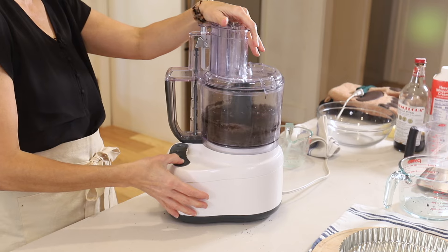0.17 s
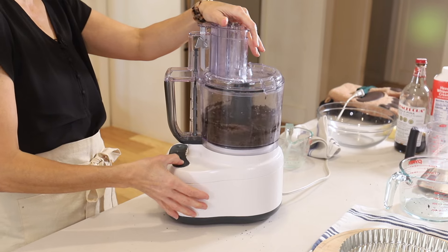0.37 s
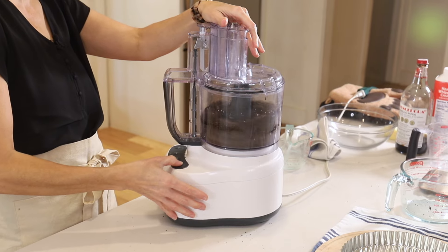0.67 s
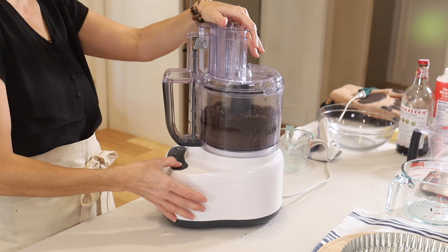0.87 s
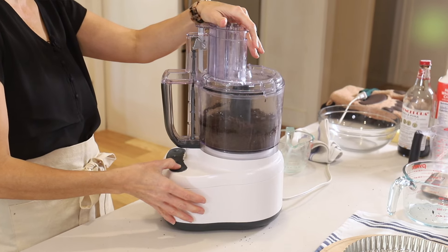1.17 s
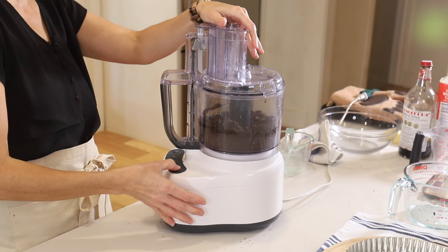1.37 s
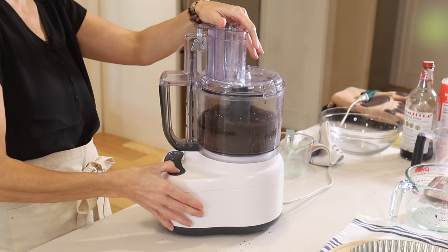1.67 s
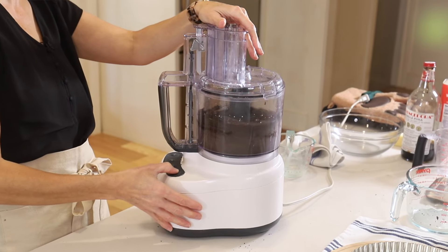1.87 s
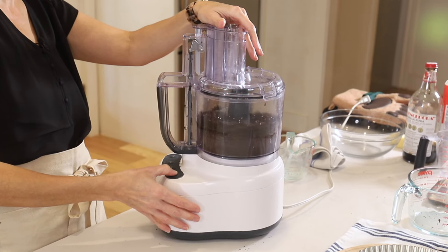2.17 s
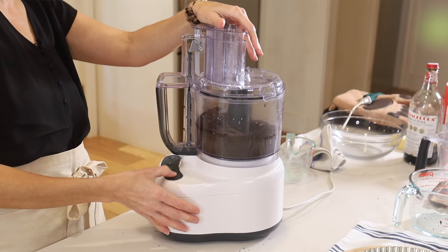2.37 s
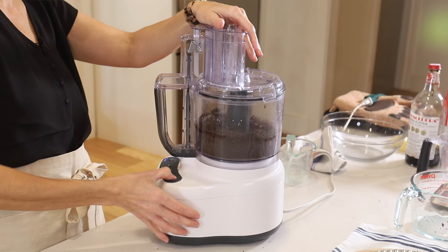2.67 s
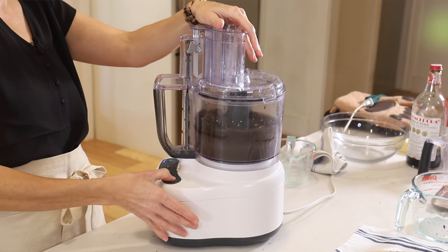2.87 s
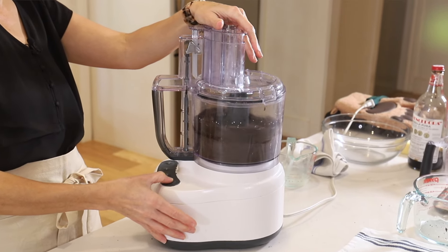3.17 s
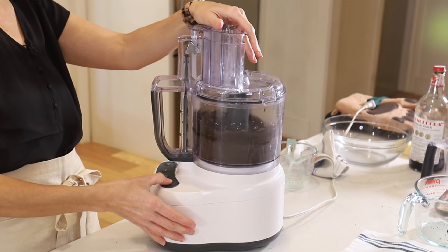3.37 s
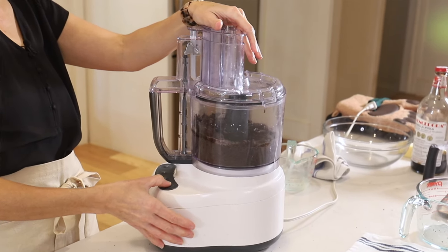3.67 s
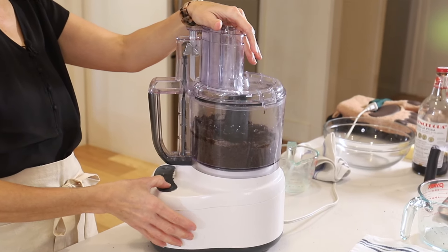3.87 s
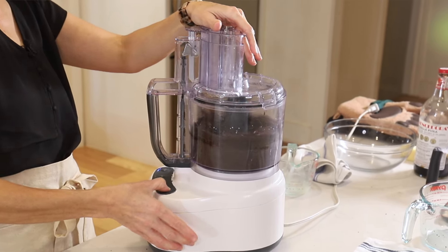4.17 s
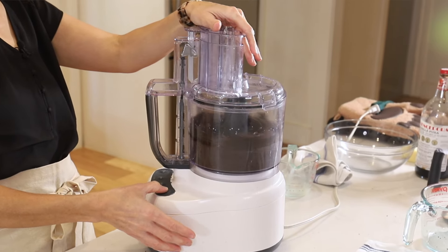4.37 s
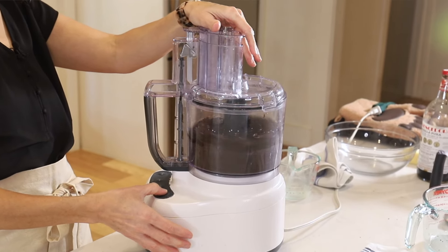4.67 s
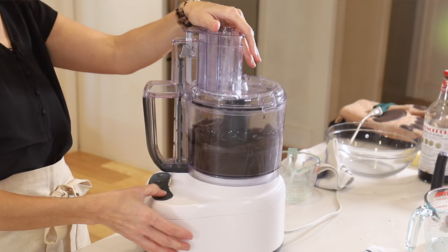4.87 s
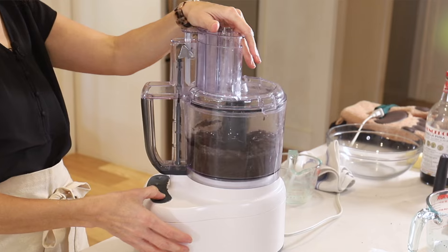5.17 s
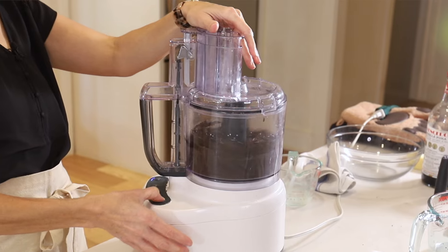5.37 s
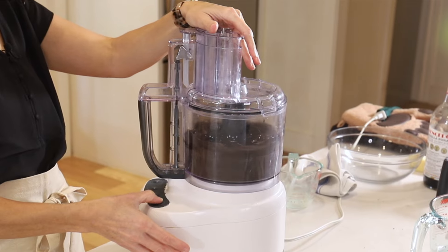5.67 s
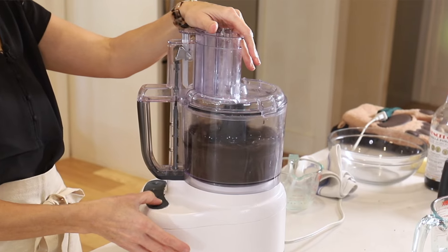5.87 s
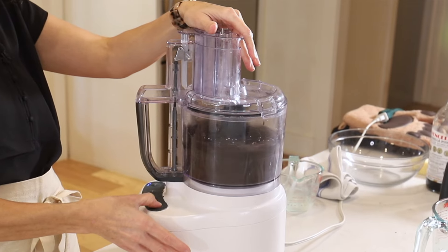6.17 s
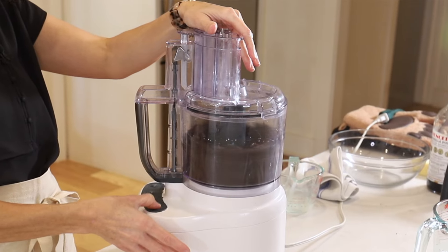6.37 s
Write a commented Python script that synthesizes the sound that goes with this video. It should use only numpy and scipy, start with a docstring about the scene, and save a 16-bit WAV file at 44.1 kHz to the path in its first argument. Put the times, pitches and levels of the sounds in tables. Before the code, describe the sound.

A food processor is heard up close in a small kitchen, already coasting with a falling whine and a rattle of dry crumbs. It is pulsed at about 0.4, 1.6, 2.7, 4.0 and 5.3 seconds, each press lasting roughly a quarter of a second. Each of these starts with a light plastic switch click and a hard, clattering jolt of the housing. The rough gear whine shoots up in pitch while crumbs rattle in the hollow plastic bowl and hiss against its wall. After each release the whine slides down and the rattle dulls and fades for about a second. A larger crumb ticks near 1.8 seconds. Two quicker pulses follow at 6.0 and 6.4 seconds, the last still rising as the sound ends around 6.6 seconds. A short room reverberation and a faint, dull background lie underneath.

```python
"""On a kitchen counter in a small room, a food processor is pulsed through dry crumbs.
The motor is already coasting; seven presses spin it up.
The gear whine falls in pitch between presses and is still rising at the end.
Impacts of drive and blade excite the resonances of the plastic bowl, and crumbs pelt its wall.
Most starts bring a switch click and a jolt of the housing, over a faint steady background."""
import sys
import numpy as np
from scipy import signal
from scipy.fft import rfft, irfft, next_fast_len
from scipy.io import wavfile
from scipy.ndimage import uniform_filter1d, minimum_filter1d, map_coordinates

SR = 44100
rng = np.random.default_rng(int(sys.argv[2]) if len(sys.argv) > 2 else 0)


def generate_wav(signal):
    """Clip the signal to [-1, 1] and save it as 16-bit WAV at the path in sys.argv[1]."""
    frames = np.transpose(np.atleast_2d(signal))
    scaled = np.clip(frames, -1, 1) * 32767
    pcm = np.round(scaled).astype(np.int16)
    wavfile.write(sys.argv[1], SR, pcm)


N = 288017
TIME = np.arange(N) / SR
FREE_SPEED, STALL_PULL = 281.2, 4241   # motor: top speed [turns/s], acceleration from rest [turns/s^2]
BLADE_PASSES_PER_TURN, GEAR_TEETH = .243, 11

# spans in which the motor is powered: (press time [s], release time [s])
PRESSES = [(.4483, .6471), (1.5678, 1.8338), (2.6879, 2.9596), (4.0069, 4.2948), (5.3407, 5.5953),
           (6.0353, 6.236), (6.4142, 6.6)]
# broad response of bowl and housing: (frequency [Hz], relative level [dB])
BODY_RESPONSE = [(50, -40), (110, -28), (185, -15.5), (320, -15.5), (420, -10), (520, -12.5), (800, -8.5),
                 (1180, -14.5), (1700, -6.5), (2600, -7.5), (4000, -8), (5800, -21.5), (8200, -28),
                 (10000, -38.5), (16000, -42.5)]


def from_db(db):
    """Decibels to amplitude ratio."""
    return 10 ** (np.asarray(db) / 20)


def rms_one(x):
    """Normalisation to unit rms."""
    return x / np.sqrt(np.mean(x ** 2) + 1e-20)


def drift(rate):
    """Smooth random modulation of unit rms, changing about rate times a second."""
    knots = rng.standard_normal(4096)
    return rms_one(map_coordinates(knots, [TIME * rate], order=3, mode="wrap"))


def at_hz(points, hz):
    """Interpolation of a spectrum on a logarithmic frequency axis."""
    points = np.array(points)
    return np.interp(np.log(hz + 1), np.log(points[:, 0]), points[:, 1])


def coloured(x, spectrum, resonances=()):
    """Minimum-phase filtering by a broad spectrum and resonances; white noise keeps its power."""
    size = next_fast_len(N + SR // 2, True)
    size += size % 2
    hz = np.arange(size // 2 + 1) * SR / size
    db = at_hz(spectrum, hz)
    for centre, width, lift in resonances:
        db = db + lift / (1 + (2 * (hz - centre) / width) ** 2)
    cepstrum = irfft(np.log(rms_one(from_db(db))))
    cepstrum[1:size // 2] *= 2   # causality: nothing rings before its excitation
    cepstrum[size // 2 + 1:] = 0
    return irfft(rfft(x, size) * np.exp(rfft(cepstrum)), size)[:N]


def impacts(per_s, spread_db):
    """Shot noise: random impulses of uneven size, with the same power at any rate."""
    sizes = from_db(spread_db * np.minimum(rng.exponential(1, N), 4)) * rng.choice([-1, 1], N)
    return rms_one(sizes * (rng.random(N) < per_s / SR) / np.sqrt(per_s))


def motor_speed():
    """Rotational inertia: torque, fading with speed, spins the motor up; friction and drag brake it."""
    step_s, friction, drag = .001, 189, 1.217   # friction [turns/s^2], drag [1/s]
    times = np.arange(0, N / SR + step_s, step_s)
    speed = [85.5]   # turns/s
    for t in times[:-1]:
        now = speed[-1]
        powered = any(down <= t < up for down, up in PRESSES)
        acceleration = STALL_PULL * (1 - now / FREE_SPEED) ** 1.284 if powered else -friction - drag * now
        speed.append(max(now + step_s * acceleration, 0))
    return np.interp(TIME, times, speed)


def heap_load(speed):
    """Granular loading: rattle, spray and whine levels [dB] as the blade flings or only pushes crumbs."""
    # lie of the heap in the opening coast, then from each press:
    # (rattle offset [dB], spray offset [dB], whine offset [dB], fading speed [turns/s])
    heaps = [(1.6, 0.5, 0.5, 25.8), (-0.04, -0.3, 0.5, 19.4), (0, -0.5, 0, 20.2), (0.5, -0.5, 0, 18.6),
             (0.96, -0.1, -1.5, 15.1), (0.3, -0.8, -0.5, 18), (0.3, 0.2, -0.5, 24), (-0.5, 0, 0.5, 22)]
    # brief swells and dips in rattle and spray: (time [s], rattle change [dB], spray change [dB])
    swells = [(0.147, 2, -3), (0.505, 0.5, 1), (0.62, 0.5, 3), (0.761, 1.5, 0), (1.07, -0.5, 6),
              (1.105, 4, 2), (1.21, 1, 3), (1.284, 3.5, 0), (1.615, 2, 3), (1.648, 2.5, 9), (1.957, 3, 1.5),
              (2.295, 4.5, 0), (2.425, 2, -4), (2.753, 1.5, 5), (3.247, 0.5, -2), (3.354, 1, -2),
              (4.765, 3, 4.5), (4.82, 0.5, 1), (5.015, 1.5, 0), (5.40, 3.5, 6), (5.958, -2.5, 10)]
    take_up_s, bite_s = .034, .027   # the drive tightens before each start and bites just after
    run = np.searchsorted([down for down, up in PRESSES], TIME)
    heap_rattle_db, heap_spray_db, whine_db, fading_speed = np.array(heaps)[run].T
    pace = speed / FREE_SPEED
    torque = np.clip(np.gradient(speed) * SR / STALL_PULL, 0, 1)
    idle = 1 - sum(np.interp(TIME, [down - take_up_s, down + bite_s, up], [0, 1, 1], right=0)
                   for down, up in PRESSES)
    stopped_s = TIME - np.maximum.accumulate(TIME * (speed > 0))
    settling_db = 59 * stopped_s   # the heap settles once the blade rests
    rattle_fade_db = -29 * np.exp(-(speed / fading_speed) ** 1.1) - settling_db
    spray_fade_db = -33 * np.exp(-speed / fading_speed) - settling_db
    rattle_db = -27.5 + heap_rattle_db - 2.9 * (1 - pace) + 2.5 * torque + idle * rattle_fade_db
    spray_db = -48.5 + heap_spray_db + 8 * pace ** 3 + idle * spray_fade_db
    for s, rattle_change_db, spray_change_db in swells:
        swell = np.exp(-((TIME - s) / .012) ** 2)
        rattle_db += rattle_change_db * swell
        spray_db += spray_change_db * swell
    return rattle_db, spray_db, whine_db


def blade_sweep(turns, depth_db, lumpy_db):
    """Amplitude modulation: the load swells at each blade pass, and unevenly as the heap tumbles."""
    passing = np.cos(2 * np.pi * BLADE_PASSES_PER_TURN * turns + .5 * drift(8.6))
    return rms_one(from_db(depth_db * passing + lumpy_db * drift(200)))


def rattle(turns, pace, base_per_s, added_per_s, mesh_depth):
    """Impact noise of the loose drive and of crumbs on the blade, modulated at the gear-mesh rate."""
    knocks = impacts(base_per_s + added_per_s * pace, spread_db=-0.5)
    return rms_one(knocks * (1 + mesh_depth * np.cos(2 * np.pi * GEAR_TEETH * turns)))


def soften_contacts(knocks, pace):
    """Contact hardness: slow impacts are softer, so the rattle dulls as the motor runs down."""
    soft = signal.sosfilt(signal.butter(1, 1800, fs=SR, output="sos"), knocks) * from_db(4.0)
    hardness = np.minimum(pace / 0.39, 1)
    return hardness * knocks + (1 - hardness) * soft


def gear_whine(turns, speed, wobble_turns, rough_db, rough_radians, strain_db):
    """Rotational orders: tones locked to the shaft, modulated by blade passes and play in the gears."""
    # shaft, bearing and gear tones:
    # (order [cycles/turn], relative level when slow [dB], relative level at free speed [dB])
    orders = [(1, -20, -18), (11 / 3, -30, -23.5), (29 / 4, -33, -24), (11, -13.2, -23), (22, -13.5, -29.5),
              (33, -22.5, -22.3), (44, -19.5, -40)]
    # transmission from the gears to the shell: (frequency [Hz], gain [dB])
    gear_path = [(60, -7), (130, -5), (185, 4.5), (260, -7.5), (420, -3.5), (530, 4), (1100, 2.5),
                 (2200, 1.5), (2900, 5), (3800, -1), (6300, -8), (7400, 11), (8400, 13.5), (11000, -10)]
    pace = speed / FREE_SPEED
    strain = np.clip(np.gradient(speed) * SR / (.4 * STALL_PULL), 0, 1)
    wobble = wobble_turns * pace * np.sin(2 * np.pi * BLADE_PASSES_PER_TURN * turns)
    angle = 2 * np.pi * (turns + wobble)
    tones = np.zeros(N)
    for order, slow_db, fast_db in orders:
        level_db = slow_db + (fast_db - slow_db) * pace + at_hz(gear_path, order * speed)
        level_db += strain_db * strain * (order == GEAR_TEETH)   # torque lifts the mesh tone
        shake = rough_radians * min(order / GEAR_TEETH, 1) * drift(160)
        tones += np.sqrt(2) * from_db(level_db + rough_db * drift(90)) * np.sin(order * angle + shake)
    return tones * np.minimum(pace / 0.041, 1)


def shell(drive):
    """Forced vibration: bowl and housing radiate the drive, coloured by their resonances."""
    # peaks and one dip of bowl and housing: (frequency [Hz], bandwidth [Hz], gain [dB])
    resonances = [(528, 103, 7), (662.5, 37, 7.5), (845, 45, 1), (990, 110, 6), (1430, 504, 9.5),
                  (1684, 38, 3.5), (1975, 125, 5.5), (2157, 75, 12), (2960, 400, 5.5), (4140, 72, -3),
                  (6940, 140, 6), (7890, 140, 9)]
    return coloured(drive, BODY_RESPONSE, resonances)


def bowl_ring(drive):
    """Free decay: lightly damped modes store the knocks and sound on as the blade stops."""
    # bowl modes: (frequency [Hz], time to decay by 60 dB [s], relative level [dB])
    modes = [(503, .35, -27), (531, .2, -22.5), (1530, .05, -16), (1730, .07, -18), (2170, .07, -14),
             (2215, .06, -17)]
    ringing = np.zeros(N)
    for hz, t60, db in modes:
        radius, angle = from_db(-60 / (t60 * SR)), 2 * np.pi * hz / SR
        mode = signal.lfilter([1, 0, -1], [1, -2 * radius * np.cos(angle), radius ** 2], drive)
        ringing += from_db(db) * np.sqrt((1 - radius ** 2) / 2) * mode
    return signal.sosfilt(signal.butter(2, [300, 4000], "band", fs=SR, output="sos"), ringing)


def crumb_spray(pace, spray_db, sweep):
    """Shot noise of fine grains pelting the bowl wall; now and then a larger one ticks."""
    # crumbs on the wall: (frequency [Hz], relative spectral level [dB])
    spectrum = [(50, -42), (500, -1), (2500, 6), (5000, 8), (8000, 5.5), (9500, 0.5), (12000, -0.5),
                (15500, -6)]
    # hits of larger crumbs: (time [s], relative level [dB])
    ticks = [(0.612, -34), (0.6654, -34), (1.6435, -25), (1.8145, -16), (4.9237, -34), (5.9529, -25)]
    grains = from_db(spray_db) * sweep * impacts(per_s=12000 * (pace + .2), spread_db=2.5)
    for s, db in ticks:
        grains[round(s * SR)] += from_db(db + 6)
    return coloured(grains, spectrum)


def kitchen_reverb(direct, t60_s, wet_db):
    """Reverberation: dense reflections from counter and walls decay exponentially."""
    age = np.arange(SR // 2) / SR
    tail = rng.standard_normal(len(age)) * from_db(-60 * age / t60_s) * (age > .002)
    wet = signal.fftconvolve(direct, tail / np.linalg.norm(tail))[:N]
    return (direct + from_db(wet_db) * wet) / np.sqrt(1 + from_db(wet_db) ** 2)


def room_tone(level_db):
    """Stationary noise: the faint, dull background of the still kitchen."""
    # background: (frequency [Hz], relative spectral level [dB])
    spectrum = [(25, -28), (45, -15), (62, -2), (85, -10), (130, 1), (250, -1.5), (500, 3.5), (1000, -3.5),
                (1600, -13), (4750, -26), (10000, -25.5), (15500, -26)]
    return from_db(level_db) * coloured(rng.standard_normal(N), spectrum)


def button(decay_s):
    """Damped transient: the plastic switch clacks shut just before each of the first five starts."""
    # switch closures: (time [s], relative level [dB])
    clacks = [(.436, -53), (1.562, -48), (2.676, -45), (3.99, -46), (5.327, -43)]
    envelope = sum(from_db(db) * np.exp(-np.abs(TIME - s) / decay_s) * (TIME >= s) for s, db in clacks)
    return envelope * rng.standard_normal(N)


def jolts(rise_s, decay_s):
    """Backlash: the drive takes up its slack and kicks the housing with a thump and a hard clatter."""
    # kicks at the first six starts: (time [s], relative thump level [dB], relative clatter level [dB])
    kicks = [(0.458, -34.5, -23.5), (1.581, -36.5, -22), (2.698, -35, -24.5), (4.024, -36, -24),
             (5.351, -39.5, -22), (6.035, -47, -20)]
    # thump of the housing: (frequency [Hz], relative level [dB])
    thump_spectrum = [(50, -40), (90, -1.5), (150, -1.5), (350, 2.5), (600, 3), (1200, -15), (4000, -35)]
    # the blade's hub snaps against the shaft: (frequency [Hz], bandwidth [Hz], gain [dB])
    hub_response = [(1710, 350, -8), (3090, 270, 12.5)]
    thump, clatter = np.zeros(N), np.zeros(N)
    for s, thump_db, clatter_db in kicks:
        age = np.maximum(TIME - s, 0)
        burst = (1 - np.exp(-age / rise_s)) * np.exp(-age / decay_s)
        thump += from_db(thump_db) * burst
        clatter += from_db(clatter_db) * burst
    contacts = impacts(per_s=2500, spread_db=2)
    return (coloured(2 * thump * contacts, thump_spectrum)
            + coloured(clatter * contacts, BODY_RESPONSE, hub_response))


def scene():
    """Superposition of machine, reflections and background, the same in both channels."""
    speed = motor_speed()
    rattle_db, spray_db, whine_db = heap_load(speed)
    turns, pace = np.cumsum(speed) / SR, speed / FREE_SPEED
    sweep = blade_sweep(turns, depth_db=0.22, lumpy_db=1.08)
    knocks = sweep * rattle(turns, pace, base_per_s=1200, added_per_s=6000, mesh_depth=0.11)
    knocks = soften_contacts(knocks, pace)
    tones = gear_whine(turns, speed, wobble_turns=0.0062, rough_db=4.0, rough_radians=0.53, strain_db=2.0)
    drive = from_db(rattle_db) * (knocks + from_db(whine_db) * tones) + button(decay_s=0.011)
    machine = shell(drive) + bowl_ring(drive)
    machine += jolts(rise_s=0.0029, decay_s=0.021) + crumb_spray(pace, spray_db, sweep)
    background = room_tone(level_db=-57)
    return np.tile(kitchen_reverb(machine, t60_s=0.59, wet_db=-11.5) + background, (2, 1))


def record(dry):
    """Peak limiting and band limiting: a fast gain dip holds down peaks, a steep low-pass cuts the top."""
    ceiling, window, cutoff_hz = .24, SR // 400, 15700
    allowed = ceiling / np.maximum(np.abs(dry).max(axis=0), ceiling)
    gain = uniform_filter1d(minimum_filter1d(allowed, window), window)
    return signal.sosfilt(signal.ellip(12, .1, 90, cutoff_hz, fs=SR, output="sos"), gain * dry)


dry = scene()
out = record(dry)
generate_wav(out)
```